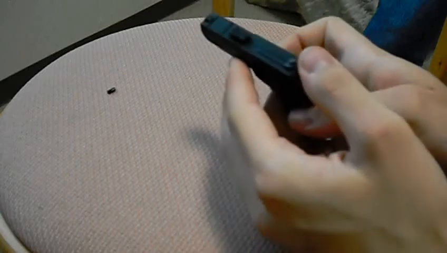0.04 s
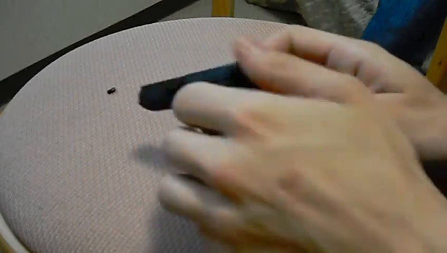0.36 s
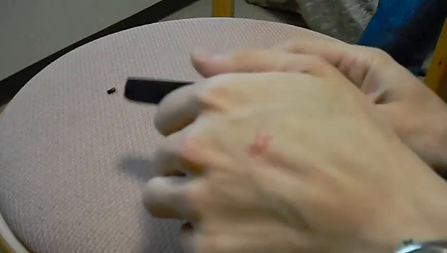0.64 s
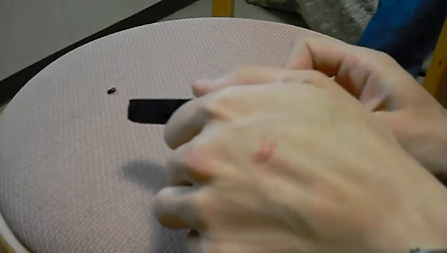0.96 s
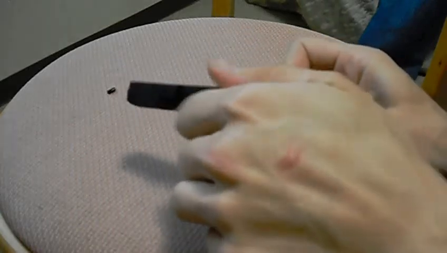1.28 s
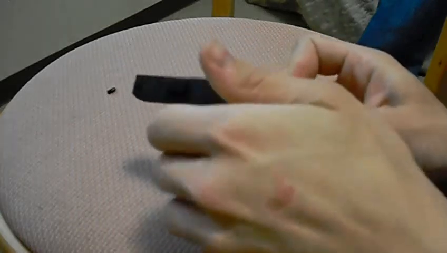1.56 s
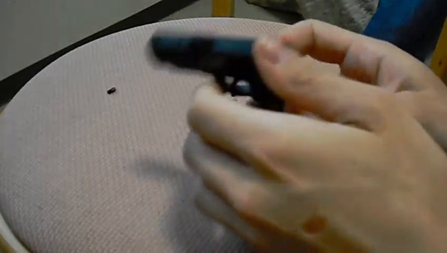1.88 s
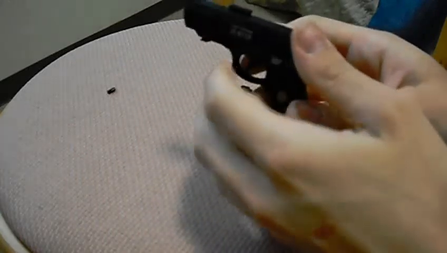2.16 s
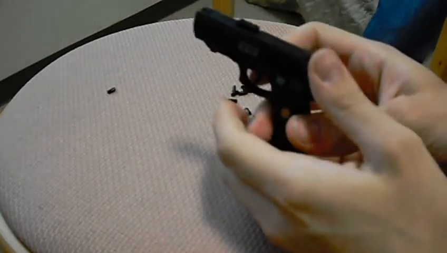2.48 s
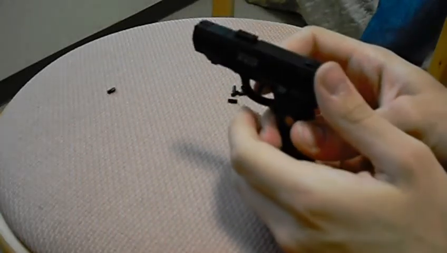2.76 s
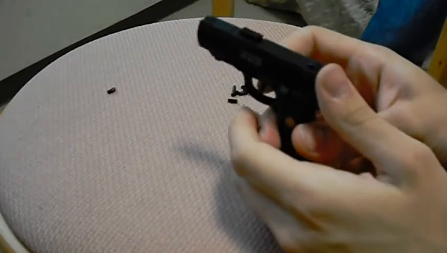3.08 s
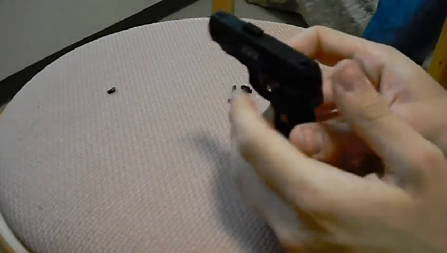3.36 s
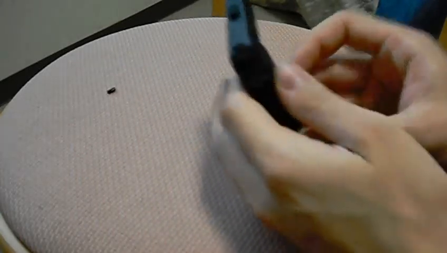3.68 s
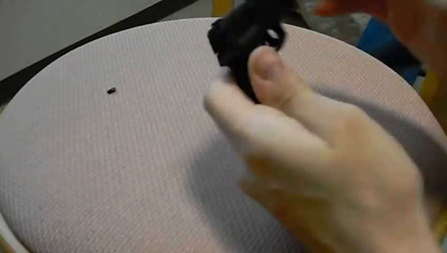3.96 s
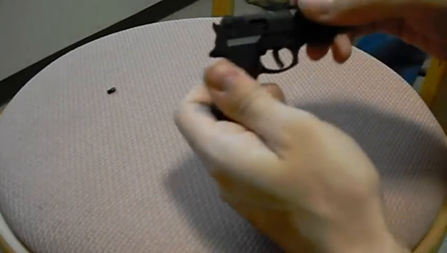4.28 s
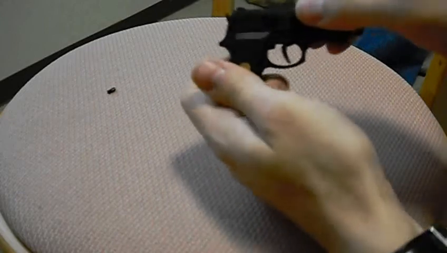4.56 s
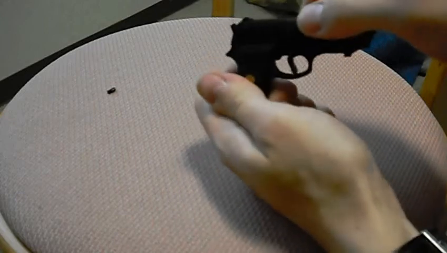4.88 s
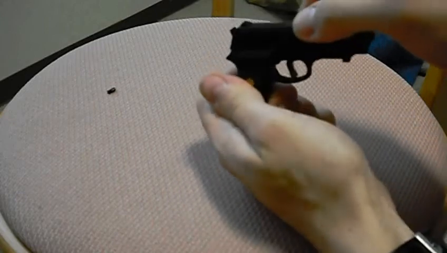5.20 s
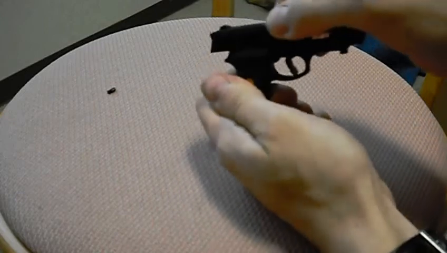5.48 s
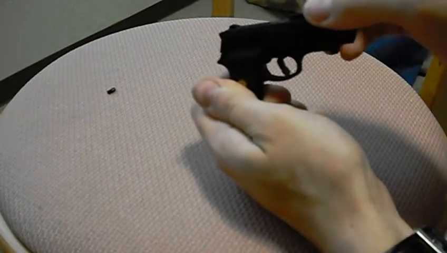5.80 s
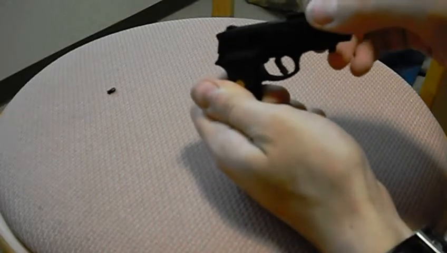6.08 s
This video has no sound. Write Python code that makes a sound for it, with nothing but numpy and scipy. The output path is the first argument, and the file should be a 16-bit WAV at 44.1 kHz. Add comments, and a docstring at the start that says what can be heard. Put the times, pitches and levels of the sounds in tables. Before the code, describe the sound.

Close up in a small room, over faint microphone hiss and pulsing rumble, hands cock a plastic model pistol with light ticks and two crisp snaps. The spring releases in a single loud pop that briefly overloads the microphone. Fingers quietly tap and rub the grip, then the slide slams home with a hollow clack, followed by small ticks and one lighter snap.

```python
"""A small plastic spring pistol is worked by hand over a padded chair, close to a webcam in a small room.
Microphone hiss and a faint pulsing electrical rumble run from the start. Fingers rub, loose parts tick,
and near 1 s the slide is racked with two snaps that ring the hollow shell. At 2.7 s the piston fires and
pops the chamber, overloading the microphone with a low thump. Fingers tap and rub the grip, then just
after 5 s the slide is snapped back and forth again, slamming home with a hollow pop."""
import sys
import numpy as np
from scipy import signal
from scipy.fft import rfft, irfft, next_fast_len
from scipy.io import wavfile
from scipy.ndimage import uniform_filter1d, map_coordinates

SR = 44100
rng = np.random.default_rng(int(sys.argv[2]) if len(sys.argv) > 2 else 0)


def int16_out(signal):
    """Quantize to a 16-bit WAV file."""
    q = np.round(np.clip(np.atleast_2d(signal).T, -1, 1) * 32767)
    wavfile.write(sys.argv[1], SR, q.astype(np.int16))


N = 270419


def amp(db):
    """Decibels to gain."""
    return 10 ** (np.asarray(db) / 20)


def unit(x):
    """Scale to rms 1."""
    return x / np.sqrt(np.mean(x ** 2) + 1e-20)


def along(points, hz):
    """Read a curve of (freq_hz, value) points on a log frequency axis."""
    freqs, values = np.transpose(points)
    return np.interp(np.log(hz + 1), np.log(freqs + 1), values)


def resonances(modes, hz):
    """Power response of (pitch_hz, width_hz, level_db) modes."""
    return sum(amp(2 * db) / (1 + (2 * (hz - pitch) / width) ** 2) for pitch, width, db in modes)


def filtered(x, response):
    """Equalise x with a gain given as a function of frequency."""
    size = next_fast_len(len(x) + SR // 2)
    return irfft(rfft(x, size) * response(np.fft.rfftfreq(size, 1 / SR)), size)[:len(x)]


def causal(gain):
    """The minimum-phase response with this gain: nothing sounds before the blow."""
    cepstrum = irfft(np.log(np.maximum(gain, 1e-6)))
    half = len(cepstrum) // 2
    cepstrum[1:half] *= 2
    cepstrum[half + 1:] = 0
    return np.exp(rfft(cepstrum))


def noise(spectrum):
    """Coloured noise of rms 1."""
    return unit(filtered(rng.standard_normal(N), lambda hz: amp(along(spectrum, hz))))


def wobble(rate):
    """A smooth random curve with `rate` knots a second."""
    return map_coordinates(rng.standard_normal(int(N * rate / SR) + 4), [np.arange(N) * rate / SR])


def add(track, start_s, sound):
    """Mix a sound into the track at start_s."""
    part = track[round(start_s * SR):][:len(sound)]
    part += sound[:len(part)]


# Colour of the microphone hiss: freq_hz, level_db
HISS_EQ = [(20, -1), (70, -6.5), (250, -14), (500, -14.5), (1100, -17.5), (2200, -19.5), (4500, -23.5),
           (9000, -26.5), (15500, -27.5)]
# Colour of the electrical rumble: freq_hz, level_db
RUMBLE_EQ = [(20, -24), (45, -5), (72, 2), (120, -6.5), (165, -17.5), (220, -6.5), (350, -17), (800, -21.5),
             (3000, -29.5), (15000, -36)]
# Thin electrical whines: pitch_hz, rms_db
WHINES = [(2078, -82.5), (3311, -83), (7870, -86), (15735, -76.5)]


def electronics(hiss_db=-62, rumble_db=-59.5, drift_hz=4):
    """The noise bed: microphone hiss, thin whines and a rumble that switches on and off at a steady beat."""
    t = np.arange(N) / SR
    start_s, period_s, on_s = .228, .3705, .165
    gate = uniform_filter1d(((t - start_s) % period_s < on_s) * 1., size=300)
    rumble = noise(RUMBLE_EQ)
    rumble /= np.sqrt(np.abs(uniform_filter1d(rumble ** 2, size=1500)))  # even power while it is on
    whine = np.zeros(N)
    for pitch_hz, rms_db in WHINES:
        cycles = np.cumsum(pitch_hz + drift_hz * wobble(20)) / SR
        whine += amp(rms_db) * np.sqrt(2) * np.sin(2 * np.pi * cycles)
    return amp(hiss_db) * noise(HISS_EQ) + amp(rumble_db) * gate * rumble + whine


# Colour of the friction: freq_hz, level_db
FRICTION_EQ = [(300, -19.5), (1800, -7.5), (2600, -5.5), (4600, -0.5), (6000, -10), (8000, -15.5),
               (16000, -23)]
# Strokes of sliding skin and plastic: centre_s, half_length_s, level_db, squeak_hz
STROKES = [(.11, 0.025, -66.5, 4060), (.855, 0.013, -52, 3800), (1.17, 0.058, -53.5, 4200),
           (3.312, .05, -70.5, 4880), (3.429, 0.028, -65, 4710), (3.819, 0.036, -68.5, 4180),
           (4.06, 0.031, -63, 5100), (5.141, 0.017, -59.5, 4200), (5.431, 0.055, -57.5, 4070),
           (5.51, 0.0096, -53, 2580)]


def rubs(squeak_width_hz=400, squeak_db=7, broadband_power=5):
    """Sliding strokes swell and fade, catching in tiny grains and squeaking faintly."""
    out, t = np.zeros(N), np.arange(N) / SR
    friction = unit(noise(FRICTION_EQ) * amp(3 * wobble(600)))
    for centre_s, half_s, level_db, squeak_hz in STROKES:
        near = np.abs(t - centre_s) < 4 * half_s
        squeak = [(squeak_hz, squeak_width_hz, squeak_db)]
        stroke = filtered(friction[near], lambda hz: np.sqrt(broadband_power + resonances(squeak, hz)))
        swell = np.exp(-.5 * ((t[near] - centre_s) / half_s) ** 2)
        out[near] += amp(level_db) * swell * unit(stroke)
    return out


# Ring of the hollow plastic frame and slide: pitch_hz, width_hz, level_db
SHELL_MODES = [(2390, 310, 0.5), (3160, 400, -5.5), (3480, 900, -7.5), (4100, 660, -3), (4710, 550, -5.5),
               (5720, 190, -8.5), (6300, 400, -7), (8800, 700, -12.5), (10200, 1100, -12.5),
               (11500, 700, -13)]
# Broadband crack of a contact: freq_hz, level_db
CRACK_EQ = [(30, -32.5), (300, -25.5), (1100, -22), (1950, -13), (2400, -9.5), (4500, -10.5), (7300, -12.5),
            (11500, -9.5), (16000, -23)]


def click(pitch_hz, body_db, treble_db, t60_s, impact=2.7, part_db=8):
    """One contact: an impact and a dense chatter ring the shell; as much energy as 1 ms at rms 1."""
    size, rise_s, part_octaves, body_hz, treble_hz = 4096, .00016, .27, 1500, 7000
    t, hz = np.arange(size) / SR, np.fft.rfftfreq(size, 1 / SR)
    force = rng.standard_normal(size) * amp(-60 * t / t60_s)
    force *= 1 - np.exp(-t / rise_s)  # the parts take a moment to bear on each other
    force[0] -= impact
    drive = rfft(force)
    # the chatter drives all bands evenly, so the colour belongs to the plastic
    flatten = 1 / np.sqrt(uniform_filter1d(np.abs(drive) ** 2, size=70))
    plastic = np.sqrt(resonances(SHELL_MODES, hz) + amp(2 * along(CRACK_EQ, hz)))
    # the struck part adds a broad resonance; heavy contacts move the whole frame, hard edges add treble
    bell = part_db * np.exp(-.5 * (np.log2((hz + 1) / pitch_hz) / part_octaves) ** 2)
    low_shelf = body_db / (1 + (hz / body_hz) ** 4)
    high_shelf = treble_db / (1 + (treble_hz / (hz + 1)) ** 6)
    sound = irfft(drive * causal(flatten * plastic * amp(bell + low_shelf + high_shelf)))
    return sound / np.sqrt(np.sum(sound ** 2) * 1000 / SR)


def tick(pitch_hz, treble_db, t60_s):
    """A light, crisp contact: big, low parts move the whole frame; small, high ones hardly do."""
    body_db = 1.5 - 22 * np.log2(pitch_hz / 4000)
    return click(pitch_hz, body_db, treble_db, t60_s, impact=2.4, part_db=6)


# Decay of the small room: freq_hz, t60_s
ROOM_DECAY = [(300, .15), (2400, .36), (4500, .35), (8000, 0.29), (15000, 0.35)]
# Resonances that hang on in the tail: pitch_hz, width_hz, level_db
TAIL_MODES = [(2460, 290, 2), (4200, 860, -2.5), (5760, 220, -.5), (8550, 800, -2.5)]
# Slaps off hard surfaces nearby: delay_s, level_db
SLAPS = [(.0046, -16), (.0098, -17), (0.0143, -17)]
# Colour of all the reflections: freq_hz, gain_db
ROOM_EQ = [(100, -13), (1000, -11), (1850, -14), (2350, -7.5), (4500, -9), (7500, 6), (10000, -0.5),
           (16000, -0.5)]


def room(sound, tail_db=-12, early_db=-17, early_t60_s=.035, predelay_s=.0023):
    """Nearby furniture answers at once, then the room dies away, each frequency at its own speed."""
    hz, t, bands = signal.stft(rng.standard_normal(SR // 2), SR, nperseg=256)
    decay = amp(-60 * t / along(ROOM_DECAY, hz)[:, None])
    tail = signal.istft(bands * decay, SR, nperseg=256)[1]
    tail = filtered(tail / np.linalg.norm(tail), lambda hz: np.sqrt(1 + resonances(TAIL_MODES, hz)))
    t = np.arange(len(tail)) / SR
    early = rng.standard_normal(len(t)) ** 3 * amp(-60 * t / early_t60_s)  # cubed for a spiky texture
    response = amp(tail_db) * tail + amp(early_db) * early / np.linalg.norm(early)
    response = np.pad(response, (round(predelay_s * SR), 0))
    for delay_s, level_db in SLAPS:
        add(response, delay_s, amp([level_db]))
    response = filtered(response, lambda hz: amp(along(ROOM_EQ, hz)))
    response[0] += 1  # the direct sound
    return signal.fftconvolve(sound, response)


def snags(count=9, per_s=99, over_rub_db=9.5, scatter_db=2):
    """Around the middle of each stroke the part snags in tiny uneven ticks, harder the louder it rubs."""
    out = np.zeros(N)
    for centre_s, half_s, level_db, squeak_hz in STROKES:
        for k, (jitter, strength) in enumerate(rng.standard_normal((count, 2))):
            offset_s = (k - count // 2 + jitter / 4) / per_s
            swell = np.exp(-.5 * (offset_s / half_s) ** 2)
            force = amp(level_db + over_rub_db + scatter_db * strength) * swell
            add(out, max(centre_s + offset_s, 0), force * tick(squeak_hz, treble_db=-7.5, t60_s=.025))
    return room(out)[:N]


# Light contacts of loose parts: start_s, level_db, pitch_hz, treble_db, t60_s
LOOSE_TICKS = [(0.2816, -40, 3350, -13, 0.022), (.485, -49.5, 3900, -9, 0.02),
               (0.8788, -39.5, 2750, -5.5, .013), (.8999, -37.5, 5390, -2, 0.022),
               (1.0858, -32.5, 2700, -7.5, 0.029), (1.1763, -33, 3500, -2, 0.014),
               (1.504, -39, 3950, -17, .014), (3.442, -43.5, 4780, -9, 0.052),
               (5.115, -34.5, 3930, -13.5, .012), (5.337, -34.5, 4930, -10.5, 0.015),
               (5.3811, -34, 2900, -32, .006), (5.433, -35.5, 11000, 3, .01),
               (5.4486, -30.5, 3800, -4, 0.044)]


def loose_parts():
    """Loose parts tick against the frame as the pistol is handled."""
    out = np.zeros(N)
    for start_s, level_db, pitch_hz, treble_db, t60_s in LOOSE_TICKS:
        add(out, start_s, amp(level_db) * room(tick(pitch_hz, treble_db, t60_s)))
    return out


# Spring-driven hits, each led in by the smaller, brighter click of its catch:
# land_s, level_db, pitch_hz, body_db, treble_db, t60_s, catch_lead_s, catch_relative_db, catch_pitch_hz
SPRING_SNAPS = [(0.9219, -8, 4550, -5.5, 0.5, 0.012, .0054, -15, 3150),
                (1.151, -16, 4900, -1, 7, 0.026, 0.0034, -12.5, 6070),
                (2.7007, 0, 4110, 7, 2, 0.0058, .0016, -14, 3777),
                (2.7032, -2.5, 3500, 10.5, 5.5, 0.012, .0019, -13, 2895),
                (5.153, -20.5, 4150, -3, -2, 0.013, .0097, -4, 4300),
                (5.1741, -6.5, 5370, 6, -1, 0.013, .0011, -16, 2630),
                (5.5147, -14, 4300, -11, -15.5, 0.013, .0012, -3.5, 2480)]


def snaps(echo_s=.0123, echo_db=-23.5):
    """Slide, sear and piston slip their catches and strike the frame; a faint, quick echo follows each."""
    out = np.zeros(N)
    for land_s, level_db, pitch_hz, body_db, treble_db, t60_s, lead_s, catch_db, catch_hz in SPRING_SNAPS:
        catch = click(catch_hz, body_db - 2, treble_db + 3.5, t60_s=.012)
        add(out, land_s - lead_s, amp(level_db + catch_db) * room(catch))
        for delay_s, drop_db in [(0, 0), (echo_s, echo_db)]:
            snap = click(pitch_hz, body_db, treble_db, t60_s)
            add(out, land_s + delay_s, amp(level_db + drop_db) * room(snap))
    return out


# Soft finger taps on the grip: start_s, level_db, pitch_hz, t60_s
FINGER_TAPS = [(1.0865, -43, 814, 0.059), (3.1045, -42, 637, 0.057), (3.4859, -41.5, 721, .021),
               (5.383, -38, 640, 0.025), (5.709, -38.5, 393, 0.087), (5.838, -45, 790, 0.025)]


def taps(ring=.32, scuff=.4):
    """Fingertips knock dully on the hand-damped grip: a short tone under a muffled scuff."""
    out, t = np.zeros(N), np.arange(SR // 10) / SR
    for start_s, level_db, pitch_hz, t60_s in FINGER_TAPS:
        flesh = unit(filtered(rng.standard_normal(len(t)), lambda hz: 1 / (1 + (hz / (2 * pitch_hz)) ** 4)))
        tone = np.sin(2 * np.pi * pitch_hz * t)
        add(out, start_s, amp(level_db - 60 * t / t60_s) * (ring * tone + scuff * flesh))
    return out


def cavity_pop(modes):
    """Trapped air rings for a few cycles as decaying sines."""
    t = np.arange(SR // 20) / SR
    return sum(amp(db - 60 * t / t60_s) * np.sin(2 * np.pi * hz * t) for hz, db, t60_s in modes)


# The thump of the shot, one swing down and one up: start_s, length_s, peak_amplitude
THUMP_PULSES = [(2.7008, .0017, -.75), (2.7046, .0027, .48)]
# Pop of the piston chamber and barrel: pitch_hz, level_db, t60_s
CHAMBER_MODES = [(420, -10, .014), (980, -3, .013), (1290, -5, .01), (1980, -5.5, 0.007)]


def shot(pop_s=2.7021):
    """The piston pops the chamber; the overloaded input is knocked off centre and back with a low thump."""
    out, t = np.zeros(N), np.arange(SR // 20) / SR
    for start_s, length_s, peak in THUMP_PULSES:
        pulse = np.sqrt(np.abs(np.sin(np.pi * t / length_s))) * (t < length_s)
        add(out, start_s, peak * pulse)
    add(out, pop_s, cavity_pop(CHAMBER_MODES))
    return out


# Pop of the air in the hollow slide: pitch_hz, level_db, t60_s
SLIDE_MODES = [(670, -4.5, 0.0021), (1884, 7.5, 0.0031)]


def slide_slam(slam_s=5.1747, hang_s=.0317, offset_db=-29.5):
    """The slide pops home and knocks the microphone off centre; it hangs, then returns with a soft tick."""
    t = np.arange(N) / SR
    out = amp(offset_db) * ((t > slam_s) & (t < slam_s + hang_s))
    add(out, slam_s, cavity_pop(SLIDE_MODES))
    return out


def scene():
    """The pistol and the hands over the microphone's own noise, in mono."""
    pistol = snaps() + loose_parts() + shot() + slide_slam()
    handling = taps() + rubs() + snags()
    return (pistol + handling + electronics())[None]


def record(dry):
    """The input soft-clips the hardest snaps, then a steep low-pass trims the very top."""
    ceiling, hardness, cutoff_hz = .76, 4, 15850
    clipped = dry[0] / (1 + np.abs(dry[0] / ceiling) ** hardness) ** (1 / hardness)
    return filtered(clipped, lambda hz: 1 / (1 + (hz / cutoff_hz) ** 120))[None]


dry = scene()
out = record(dry)
int16_out(out)
```